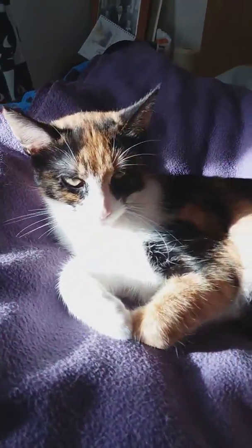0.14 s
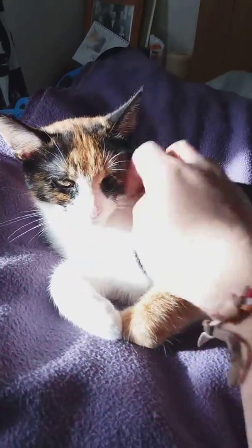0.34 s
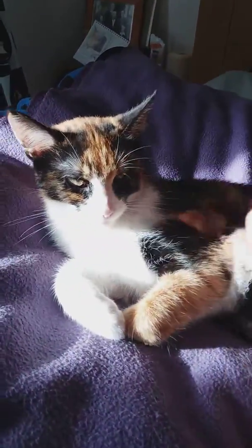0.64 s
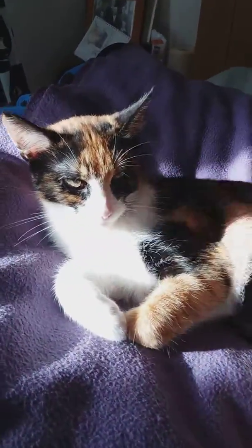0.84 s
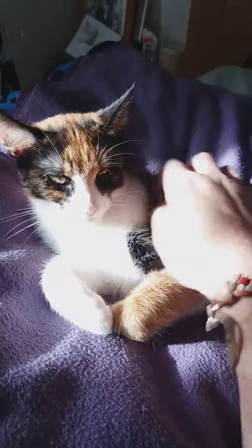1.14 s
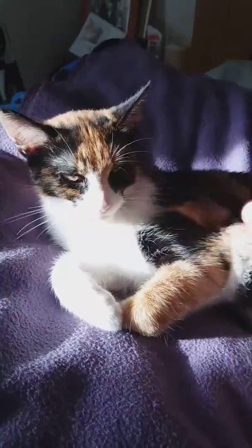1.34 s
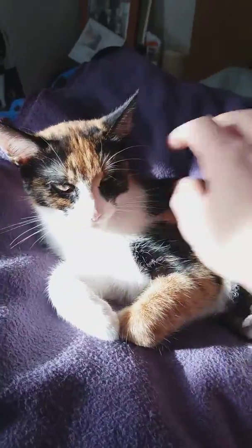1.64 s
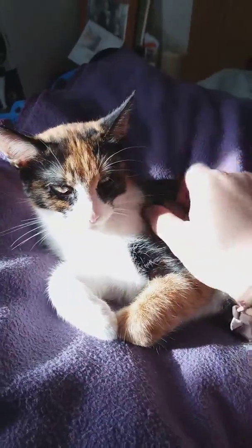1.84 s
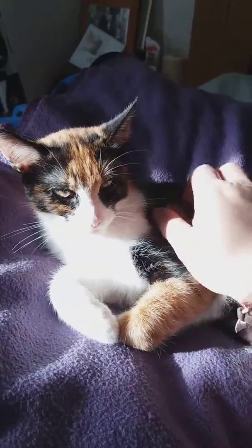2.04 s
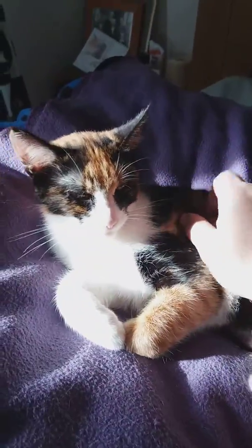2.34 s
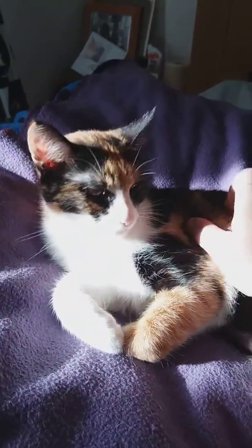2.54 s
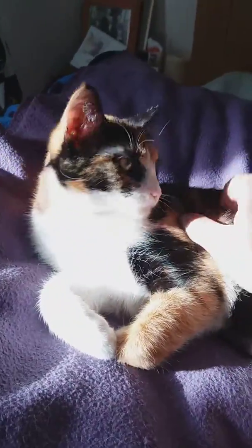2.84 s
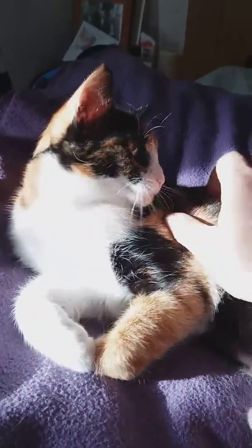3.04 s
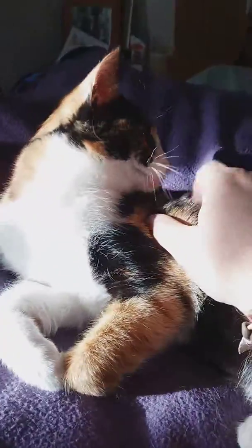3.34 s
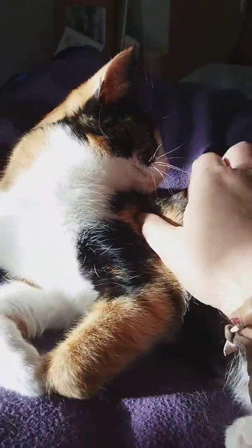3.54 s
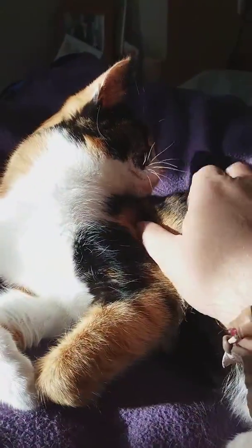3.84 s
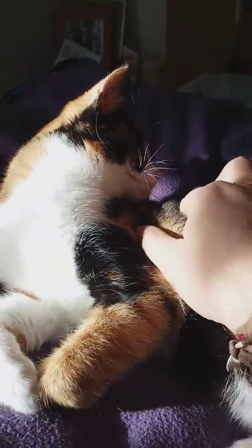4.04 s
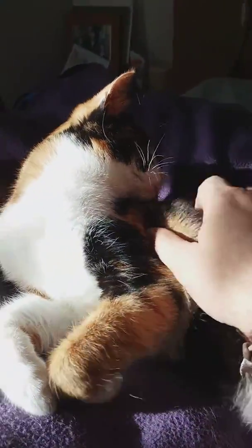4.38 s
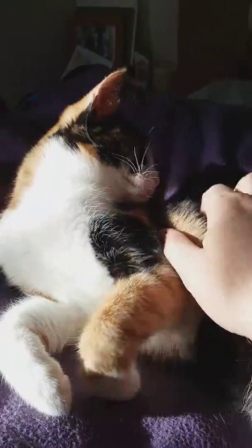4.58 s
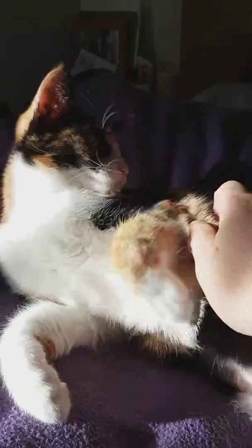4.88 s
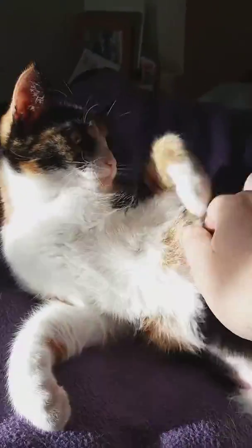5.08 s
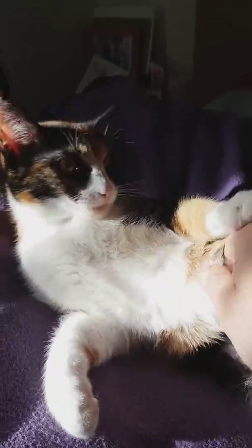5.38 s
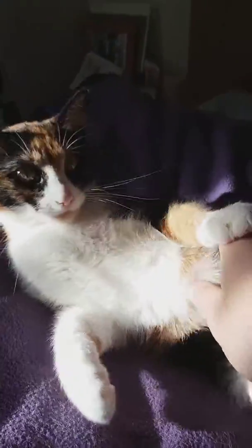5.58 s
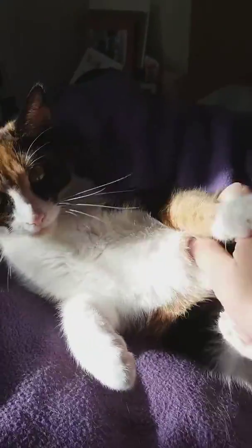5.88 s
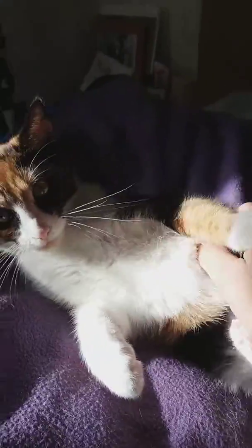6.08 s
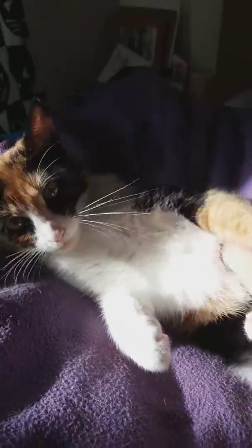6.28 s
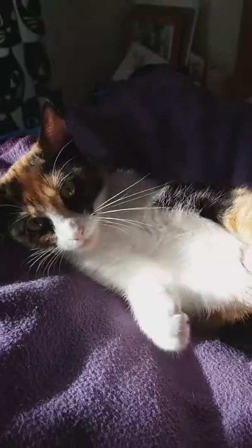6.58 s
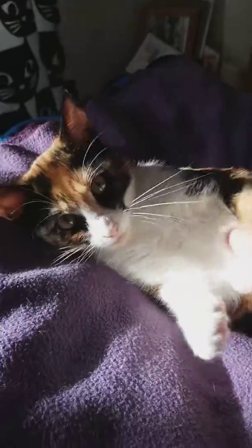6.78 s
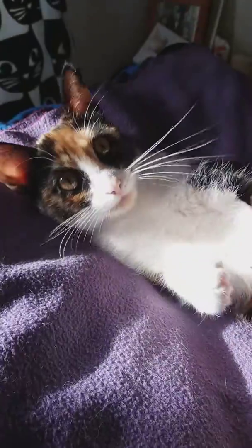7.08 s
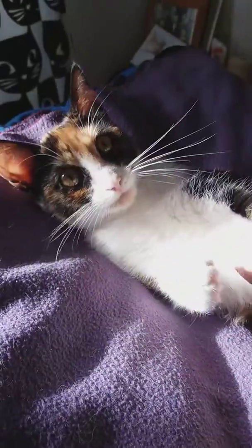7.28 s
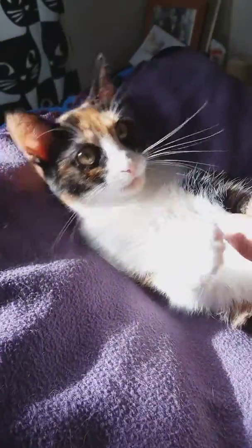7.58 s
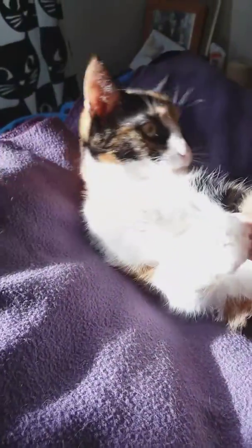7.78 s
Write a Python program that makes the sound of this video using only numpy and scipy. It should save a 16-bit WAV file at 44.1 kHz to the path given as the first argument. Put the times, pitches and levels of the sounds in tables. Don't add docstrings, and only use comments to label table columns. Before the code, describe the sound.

Soft low buffeting right against a phone microphone, as a hand moves around a cat on a blanket. A quick opening run of heavy muffled thumps peaks after a second, then gaps open with single bumps and small clusters near three, four, five and seven seconds. Faint rumble, fluttering air, brushing rustles and thin hiss continue underneath; the room is quiet and dry.

```python
import sys
import numpy as np
from scipy import signal
from scipy.fft import rfft, irfft, next_fast_len
from scipy.io import wavfile
from scipy.ndimage import map_coordinates

SR = 44100
rng = np.random.default_rng(int(sys.argv[2]) if len(sys.argv) > 2 else 0)


def boost_factor(decibels):
    exponent = np.asarray(decibels, float) / 20
    return 10 ** exponent


def wav_out(sig):
    wavfile.write(sys.argv[1], SR, np.round(np.clip(np.atleast_2d(sig).T, -1, 1) * 32767).astype(np.int16))


N = 349272


def unit(x):
    return x / np.sqrt(np.mean(x ** 2) + 1e-20)


def curves(rows):
    s, *columns = np.transpose(rows)
    t = np.arange(N) / SR
    return [np.interp(t, s, column) for column in columns]


def wobble(rate):
    knots = rng.standard_normal(int(N * rate / SR) + 4)
    return map_coordinates(knots, [np.arange(N) * rate / SR])


def noise(spectrum):
    m = next_fast_len(N + 8192)
    hz, db = np.transpose(spectrum)
    log_hz = np.log(np.fft.rfftfreq(m, 1 / SR) + 1)
    gain = boost_factor(np.interp(log_hz, np.log(hz + 1), db))
    return unit(irfft(rfft(rng.standard_normal(m)) * gain, m)[:N])


def placed(shapes, seconds, db):
    size = shapes.shape[1]
    shapes = shapes * (boost_factor(db) / np.abs(shapes).max(axis=1))[:, None]
    at = np.round(seconds * SR).astype(int)[:, None] + np.arange(size)
    return np.bincount(at.ravel(), shapes.ravel(), N + size)[:N]


def input_stage(hz):
    low_cut_hz, smear_hz = 52, 400
    cut = signal.freqs(*signal.butter(8, low_cut_hz, "hp", analog=True), hz)[1]
    return cut * (1j * hz - smear_hz) / (1j * hz + smear_hz)


def pops(eddies, size=8192):
    s, db, sharp_hz = np.transpose(eddies)
    hz = np.fft.rfftfreq(size, 1 / SR)
    u = 1j * hz / sharp_hz[:, None]
    bump = u ** 2 / (1 + u) ** 7
    rounded = np.exp(-np.abs(u / 4.9) ** 2)
    lead = 128
    shape = np.roll(irfft(bump * rounded * input_stage(hz), size), lead, axis=1)
    return placed(shape, np.maximum(s - lead / SR, 0), db)


def pushes_and_pulls(rows, is_push, size=8192):
    return pops(rows[is_push], size) - pops(rows[~is_push], size)


def grains(swells, dull_hz, count):
    scatter_db, octaves = 12.5, 1.59
    s, length, db = np.transpose(swells)[:, :, None]
    when, small, sharp, sign = np.moveaxis(rng.random((len(swells), count, 4)), 2, 0)
    rows = np.array([s + length * when, db - scatter_db * small, dull_hz * 2 ** (octaves * sharp)])
    return pushes_and_pulls(rows.reshape(3, -1).T, sign.ravel() >= 0.5, size=4096)


# (frequency [Hz], level [dB])
HISS_COLOUR = [(150, -44.5), (350, -2), (600, -3), (1000, -4.5), (1870, -7.5), (3640, -11.5), (7410, -21.5),
               (10000, -17), (12600, -9.5), (14000, -11), (15600, -11)]


def preamplifier_hiss(dry):
    load = np.abs(signal.lfilter([1 / 4000], [1, 1 / 4000 - 1], np.abs(dry)))
    level_db = -67.5 + 0.26 * wobble(9.8) - 12 * load
    return boost_factor(level_db) * noise(HISS_COLOUR)


def swarm(count=420):
    when, faint, sharp, sign = rng.random((count, 4)).T
    db = -5 * np.log(faint + 0.0017)
    rows = np.transpose([when * N / SR, db, 110 * 2 ** (1.57 * sharp)])
    return unit(pushes_and_pulls(rows, sign < 0.5, size=4096))


# (time [s], level [dB])
AIR_SPEED = [(0.0, -73), (0.2, -59.5), (0.55, -54), (0.81, -56.5), (0.95, -51.5), (1.21, -62.5),
             (1.43, -60), (2.27, -66), (2.56, -50.5), (3.2, -47.5), (3.81, -52.5), (4.08, -63.5),
             (4.83, -62), (5.51, -56.5), (6.11, -65), (6.44, -59), (7.34, -61.5), (7.92, -50.5)]
# (frequency [Hz], level [dB])
RUMBLE_COLOUR = [(20, -40.5), (35, -16.5), (50, -10), (64, 3.5), (90, -4.5), (130, -9), (200, -38.5),
                 (400, -54.5), (800, -120)]
# (frequency [Hz], level [dB])
FLUTTER_COLOUR = [(60, -54.5), (110, -8), (150, -7), (220, 0.5), (320, -4), (500, -36), (900, -41),
                  (2000, -120)]


def draught():
    speed_db, = curves(AIR_SPEED)
    rumble_db = -44 + 0.29 * (speed_db - speed_db.mean())
    rumble = unit(boost_factor(2.2 * wobble(15)) * noise(RUMBLE_COLOUR))
    smooth_flutter = unit(boost_factor(4 * wobble(40)) * noise(FLUTTER_COLOUR))
    flutter = unit(smooth_flutter + swarm())
    return boost_factor(rumble_db) * rumble + boost_factor(speed_db - 2) * flutter


# (start time [s], length [s], peak level [dB])
RUSTLE_SWELLS = [(0.09, 0.034, -41.5), (0.5, 0.064, -43), (1.05, 0.087, -39), (2.42, 0.032, -34.5),
                 (2.52, 0.2, -36.5), (2.93, .1, -42), (3.25, .04, -41), (3.45, 0.057, -37.5),
                 (3.56, .12, -34), (4.66, .06, -44), (5.02, 0.052, -33), (5.535, 0.0294, -37),
                 (5.7, 0.057, -40.5), (6.18, 0.11, -38), (6.43, 0.05, -39), (6.553, 0.013, -36.5),
                 (6.82, 0.079, -37), (6.95, 0.11, -42.5), (7.22, 0.056, -36.5), (7.8, .11, -33)]


def rustles():
    return grains(RUSTLE_SWELLS, dull_hz=70, count=12)


# (time [s], peak level [dB])
FAINT_PUFFS = [(0.209, -41.5), (1.071, -51), (1.127, -42), (1.394, -35), (1.57, -41.5), (2.432, -49),
               (2.532, -38), (2.599, -50), (2.638, -56), (3.468, -39), (3.696, -30), (4.342, -38),
               (4.667, -47), (4.81, -38.5), (5.413, -37.5), (5.699, -47), (5.749, -33), (5.905, -41),
               (6.197, -39.5), (6.3, -37.5), (6.439, -39), (6.867, -41), (7.004, -45), (7.226, -44),
               (7.463, -41.5), (7.556, -41)]


def puffs():
    return pops([(s, db, 190) for s, db in FAINT_PUFFS])


# (time [s], peak level [dB], sharpness [Hz], push 1 or pull -1)
BLUNT_HEAVES = [(0.1047, -30, 59.8, -1), (0.4407, -27.5, 53, -1), (0.4556, -30, 106, 1),
                (0.5429, -34, 52.8, -1), (0.7594, -28.5, 161, 1), (0.761, -36.5, 400, -1),
                (0.867, -27, 122, 1), (0.9829, -25, 46.4, -1), (1.242, -28, 260, -1),
                (1.2667, -37, 261, -1), (3.2093, -37, 300, 1), (2.9352, -32.5, 80, -1),
                (3.1478, -34, 53, -1), (3.1785, -30, 70, 1), (3.6936, -33.5, 53, -1), (3.755, -31.5, 70, 1),
                (3.6753, -37, 445, 1), (4.0727, -30.5, 114, 1), (4.1162, -32, 70, -1),
                (4.421, -33, 40.6, -1), (4.0463, -38, 257, -1), (5.0661, -35, 261, -1),
                (5.3805, -31.5, 39.8, -1), (6.219, -37, 60, -1), (6.4839, -27.5, 40.2, 1),
                (6.6072, -25, 105.6, 1), (6.943, -26.5, 92.8, -1), (7.2324, -31.5, 40, -1),
                (7.2624, -30, 121, -1), (7.3344, -26, 140, -1)]


def heaves():
    rows = np.array(BLUNT_HEAVES)
    return pushes_and_pulls(rows[:, :3], rows[:, 3] > 0)


# (time [s], peak level [dB])
EDGE_TICKS = [(0.6679, -56), (0.6875, -43), (0.692, -51.5), (1.247, -44), (1.2545, -33), (1.2585, -47),
              (1.27, -40), (1.7786, -42), (1.784, -48), (3.0684, -53), (3.0738, -42), (3.076, -41.5),
              (3.098, -40), (3.11, -60.5), (3.1157, -42), (3.1588, -45), (3.21, -58), (3.7105, -55.5),
              (6.4991, -54)]


def ticks(size=1024):
    s, db = np.transpose(EDGE_TICKS)
    t = np.arange(size) / SR
    burst = rng.standard_normal((len(s), size)) * (t / 0.0011) * np.exp(-t / 0.0006)
    burst[:, 30] += 5
    dull = signal.sosfilt(signal.butter(1, [900, 1500], "bp", fs=SR, output="sos"), burst)
    dull = signal.sosfilt(signal.butter(3, 2200, fs=SR, output="sos"), dull)
    return placed(dull, s, db - 1.5)


def fronted_pops(strong, weak):
    lead_s, sharper, weak_front_db = 0.00081, 1.787, -28.5
    rows = list(strong) + [(*row, weak_front_db) for row in weak]
    s, db, sharp_hz, front_db = np.transpose(rows)
    body = pops(np.transpose([s, db, sharp_hz]))
    front = pops(np.transpose([s - lead_s, db + front_db, sharper * sharp_hz]))
    return body + front


def wakes(strong):
    length_s, drop_db = 0.01417, -19.5
    swells = [(s, length_s, db + drop_db) for s, db, *_ in strong]
    return grains(swells, dull_hz=122, count=3)


# (time [s], peak level [dB], sharpness [Hz], front level against the peak [dB])
STRONG_PUSHES = [(0.2866, -15.5, 192, -48), (0.2933, -20, 109, -21), (0.4588, -28, 298, -23),
                 (0.629, -22, 251, -40), (0.6691, -17.5, 190, -27.5), (0.683, -14, 61.5, -27.5),
                 (0.6901, -8, 175, -31), (0.7524, -11.5, 141.6, -16.5), (0.86, -17.5, 176, -31),
                 (0.8764, -19.5, 188, -32), (0.92, -25, 261, -28), (0.93, -18.5, 180, -15),
                 (1.254, -4, 108.6, -21), (1.2696, -7, 220, -16.5), (1.7834, -18.5, 199, -18),
                 (2.457, -22, 203, -12.5), (3.068, -26, 261, -13), (3.0739, -35.5, 696, -29.5),
                 (3.1584, -20.5, 318, -41), (3.1874, -21.5, 206, -14), (3.2936, -21, 96, -18),
                 (3.7035, -18.5, 179, -10), (3.7605, -17.5, 211, -17), (5.1874, -22.5, 144, -18.5),
                 (5.3264, -12, 161, -17), (5.3429, -18.5, 245, -31), (6.5022, -21, 138, -28.5),
                 (6.6141, -17.5, 150, -24), (7.2905, -18, 164, -20), (7.3436, -19.5, 190, -28)]
# (time [s], peak level [dB], sharpness [Hz], front level against the peak [dB])
STRONG_PULLS = [(0.417, -9.5, 252, -13.5), (0.4324, -15.5, 186, -21), (0.4614, -17, 242, -20.5),
                (0.5693, -14, 224, -7.5), (0.6302, -16, 107, -25.5), (0.6907, -23, 293, -20.5),
                (0.6957, -19, 127, -20.5), (0.9218, -22.5, 236, -27), (0.9892, -11.5, 242, -13),
                (1.2629, -15.5, 73, -31), (1.273, -15.5, 180, -27.5), (2.3253, -24.5, 216, -18),
                (2.788, -22.5, 167, -15.5), (2.9054, -26.5, 192, -35), (3.0716, -16, 122, -23),
                (3.0962, -14, 215, -32), (3.1156, -13, 214, -34), (3.1286, -23.5, 159, -25),
                (3.1561, -15, 187, -24), (3.7116, -11, 200, -22), (3.9102, -24.5, 190, -32),
                (4.09, -22.5, 99, 0.5), (4.383, -9.5, 188, -12), (5.0262, -23, 237, -54),
                (6.4912, -20.5, 60.4, -26), (6.579, -16.5, 164, -25), (6.9358, -16.5, 142, -12),
                (7.2699, -22.5, 94, -4.5), (7.3415, -15.5, 119.7, -28), (7.6758, -25, 212, -42)]
# (time [s], peak level [dB], sharpness [Hz])
WEAK_PUSHES = [(0.27, -30, 250), (0.2814, -29.5, 70.4), (0.5627, -34.5, 102.7), (0.8823, -24, 227),
               (0.9147, -24, 68), (0.9404, -31.5, 40), (1.2305, -22.5, 46), (1.2395, -21, 142.6),
               (1.249, -24.5, 202), (1.2558, -19.5, 617), (1.7806, -24.5, 340), (2.4605, -26.5, 214),
               (2.524, -33, 80), (2.6564, -34.5, 70), (2.8956, -24, 71.6), (3.0841, -25.5, 214),
               (3.1034, -26, 172), (3.127, -28, 197), (3.619, -32.5, 250), (3.687, -26, 245),
               (3.718, -25.5, 109), (4.0483, -28.5, 225), (4.3907, -27, 92), (4.466, -29, 127),
               (5.0513, -36, 101), (5.3363, -32, 363), (5.5306, -27, 205), (6.2633, -35.5, 107),
               (6.4996, -28.5, 315), (7.669, -26.5, 75)]
# (time [s], peak level [dB], sharpness [Hz])
WEAK_PULLS = [(0.1039, -34, 317), (0.41, -21.5, 53), (0.6382, -26, 107), (0.6621, -20, 78.5),
              (0.684, -21, 224.5), (0.6967, -21, 45), (0.7334, -29.5, 188), (0.7437, -26.5, 60.2),
              (0.89, -24, 61), (1.0576, -28.5, 60.4), (1.071, -31.5, 146), (1.2765, -22, 93.4),
              (1.7763, -21, 78), (2.8051, -28.5, 61.5), (2.9857, -36, 198), (3.1084, -24, 168),
              (3.3831, -27.5, 210), (3.4318, -28, 147), (3.5844, -27.5, 91), (3.7742, -28.5, 51.7),
              (3.9728, -27.5, 191), (4.079, -25.5, 179), (4.1005, -26, 242), (5.352, -23.5, 47.4),
              (5.7486, -28, 115), (2.792, -31, 266), (6.5866, -28, 116), (7.3543, -23.5, 228),
              (7.7841, -39, 290), (7.8673, -32.5, 163)]


def wind_pops():
    pushes = fronted_pops(STRONG_PUSHES, WEAK_PUSHES)
    pulls = fronted_pops(STRONG_PULLS, WEAK_PULLS)
    return pushes - pulls + wakes(list(STRONG_PUSHES) + list(STRONG_PULLS))


def scene():
    air = draught() + rustles() + puffs() + heaves() + ticks() + wind_pops()
    return air[None]


def roll_off(x):
    return signal.sosfilt(signal.butter(12, 15710, fs=SR, output="sos"), x)


def record(dry):
    flat = dry / (1 + np.abs(dry / 0.72) ** 6) ** (1 / 6)
    return roll_off(flat + preamplifier_hiss(dry))


dry = scene()
out = record(dry)
wav_out(out)
```